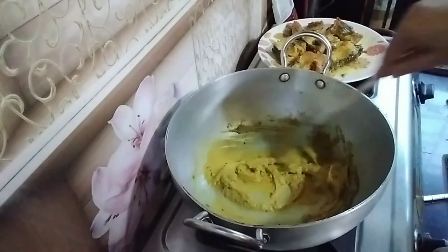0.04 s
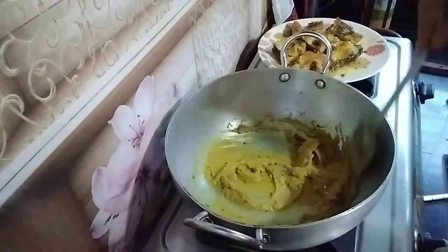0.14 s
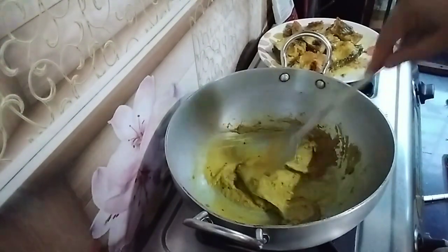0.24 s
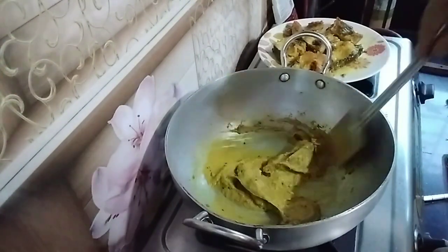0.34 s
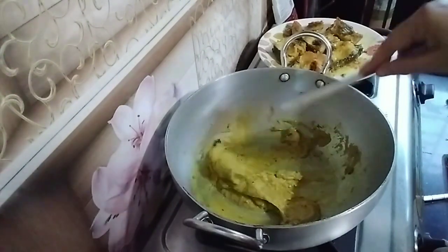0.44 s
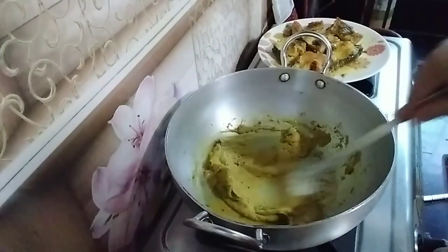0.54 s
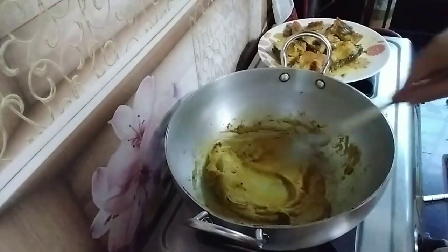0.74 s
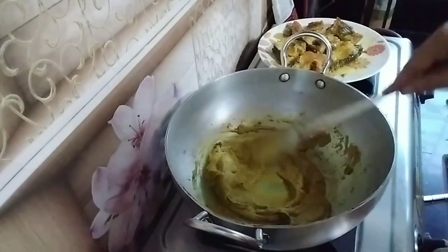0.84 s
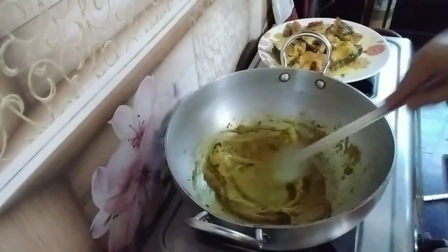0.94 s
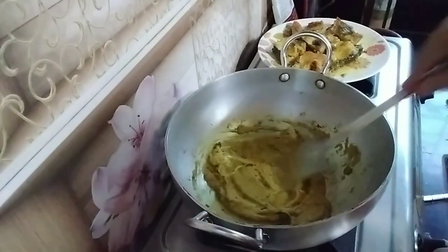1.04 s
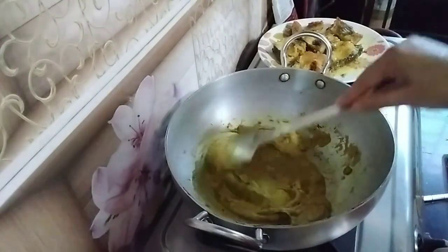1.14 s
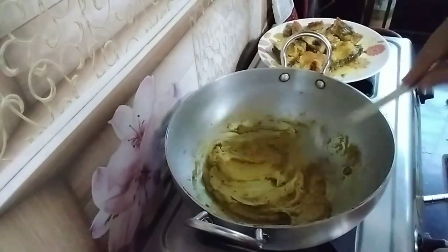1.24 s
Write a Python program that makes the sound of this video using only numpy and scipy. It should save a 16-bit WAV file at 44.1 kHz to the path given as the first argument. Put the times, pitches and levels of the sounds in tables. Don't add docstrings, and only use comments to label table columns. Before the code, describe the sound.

A metal spatula stirs thick paste in a thin metal pan. Short gritty scrapes open; at 0.2 s one loud, chattering clang rings and is quickly choked. Bright scrapes return at 0.34-0.43 s, then weaker ones from 0.6 to 0.8 s. A damped double knock lands near 1.07 s, followed by sticky ticks, a faint squeak and soft thuds until 1.3 s. Close phone microphone, small kitchen, low unsteady hum.

```python
import sys
import numpy as np
from scipy import signal
from scipy.fft import rfft, irfft, next_fast_len
from scipy.io import wavfile
from scipy.ndimage import uniform_filter1d

SR = 44100
rng = np.random.default_rng(int(sys.argv[2]) if len(sys.argv) > 2 else 0)


def dump_mix(stems):
    frames = np.atleast_2d(stems).T
    limited = np.clip(frames, -1, 1)
    pcm = np.round(limited * 32767).astype(np.int16)
    wavfile.write(sys.argv[1], SR, pcm)


def ratio_of_db(decibels):
    return 10 ** (np.asarray(decibels, float) / 20)


N = 57330
T = np.arange(N) / SR

# f/Hz, level/dB
HUM = [(12, -32), (20, 4.5), (328, -0.5), (1190, -15), (1530, -19), (1710, -18), (1910, -21), (3840, -27),
       (16000, -46)]
HUM_SIDE = [(30, 3), (100, -20.5), (350, -11), (1000, 3), (8000, -2.5)]
HUM_DB, FLICKER_DB = -49, 4.5
MAINS_HZ, MAINS_WIDTH_HZ, MAINS_DB = 103.1, 27, -55.5
RUMBLE_HZ, RUMBLE_WIDTH_HZ, RUMBLE_DB = 27, 12, -56.5

# t/s, length/s, level/dB, f/Hz
SMEARS = [
    (-0.0285, 0.058, -40, 570),
    (0.019, 0.059, -47, 920),
    (0.58, 0.051, -50, 800),
    (0.329, 0.047, -46, 300),
    (0.512, 0.088, -64, 16000),
]

# t/s, rise/s, hold/s, edge level/dB, bowl level/dB
STROKES = [(0, 0.00064, 0.015, -47, -48), (0.013, 0.013, 0.019, -48, -55.5),
           (.045, 0.012, 0.023, -57.5, -54), (0.16, .002, 0.0041, -50, -54),
           (0.174, 0.0008, 0.058, -47.5, -57), (0.3393, 0.00042, 0.0097, -37.5, -39.5),
           (0.35, 0.0034, 0.0034, -73, -66), (0.3735, 0.0025, 0.008, -37, -45),
           (.386, 0.0039, 0.021, -45, -34.5), (0.426, 0.0077, 0.041, -60.5, -72),
           (0.547, 0.013, 0.13, -64, -55), (0.608, 0.022, 0.0085, -47, -40.5),
           (0.644, 0.0034, 0.016, -62, -42), (0.674, 0.0059, 0.013, -68, -60.5),
           (0.703, 0.015, 0.037, -55, -45), (0.759, 0.0067, 0.018, -47.5, -42),
           (0.785, 0.006, 0.013, -60.5, -41), (0.812, 0.0052, 0.0084, -57.5, -49),
           (0.957, 0.0098, 0.016, -70.5, -58), (1.101, 0.0039, 0.0065, -63, -57)]
# f/Hz, width/Hz, level/dB
EDGE = [(3250, 200, -6), (4150, 250, -5), (5450, 250, -4), (6750, 200, -3), (7150, 200, -7),
        (7750, 200, -10)]
BOWL = [(1090, 90, -9), (1550, 120, -9), (1930, 100, -4), (2350, 80, -4), (2940, 100, -2), (3250, 80, -6),
        (3520, 100, -7), (4860, 250, -12)]
# f/Hz, level/dB
EDGE_DENSE = [(500, -26), (1500, -13), (3000, -5), (5500, 1), (7000, -4), (8500, -19), (16000, -34)]
BOWL_DENSE = [(300, -53), (700, -6), (1200, 2), (2700, 8), (3800, 1), (5500, -5), (9000, -28), (16000, -38)]
EDGE_DENSE_DB, BOWL_DENSE_DB, GRATE_T60_S = 2, -0.5, 0.0402
SLIPS_PER_S, SLIP_SCATTER_DB, GRIP_DB = 6000, 1.2, 1.5
RELEASE_S, STROKE_COLOUR_DB = 0.0083, 1

# t/s, length/s, level/dB, f/Hz, width/Hz
CATCHES = [(0.158, 0.032, -52, 5480, 250), (0.335, 0.017, -42, 3200, 500), (.375, 0.0054, -32, 6700, 900),
           (0.3798, 0.0055, -33.5, 6760, 900), (0.388, 0.026, -40, 2500, 300),
           (0.373, 0.013, -35, 5650, 400), (0.397, 0.012, -41, 1210, 249), (0.615, 0.03, -49.5, 6650, 200),
           (0.629, 0.03, -50, 1930, 90), (.648, .016, -45, 1077, 90), (.712, 0.031, -53, 5400, 120),
           (0.783, 0.02, -47.5, 1920, 90), (.786, .018, -47.5, 3450, 120), (.788, 0.0133, -51.5, 1120, 90),
           (0.803, 0.023, -44.5, 3070, 200), (0.834, 0.043, -62.5, 3090, 300),
           (1.114, 0.013, -59, 3080, 250)]

# t/s, level/dB, push/ms
BLOW = [
    (.2073, -4, .9),
    (.2107, -2, .14),
    (.2136, -2, .15),
    (.2165, -2, .15),
    (.2194, -3, .14),
    (.2222, -3, .14),
    (.2355, 0, .7),
]
# f/Hz, level/dB, t60/s
WALL = [(311.6, -9.5, 0.16), (352, -5.5, 0.1), (630, -1, 0.052), (667.5, 6.5, 0.048), (715, 1, .07),
        (910, -12, 0.1), (1295, 0.5, 0.3), (1290, 3, 0.24), (1520, 5, 0.1), (2160, -22, 0.057)]
WALL_EXTRA = [(2320, -6, 0.1), (2560, -10, 0.069), (2740, -15, 0.055), (2898, 5, 0.08), (3065, -7, 0.054),
              (3145, -2, .11), (3900, -8, 0.056), (4310, -4, 0.085), (5280, -3.5, .07), (5280, -1.5, 0.052),
              (6100, -16, 0.054), (6440, -11.5, 0.043)]
# f/Hz, level/dB
WALL_DENSE = [(150, -14), (250, -10), (800, -2.5), (1900, -11.5), (2960, -7), (4200, -8), (6300, -8),
              (8000, -20), (16000, -75)]
WALL_DENSE_DB, WALL_DENSE_T60_S = -1.5, 0.19
BLOW_DB, CHOKE_S, CHOKE_DB = 15.5, .227, -5
FLUTTER_DB, LOW_CUT_HZ = 4, 260
# start t/s, end t/s
CHATTER_S = (.2105, .2272)
CHATTER_DB, CHATTER_T60_S, CHATTER_PER_S, CHATTER_DAMP = -15.5, 0.015, 2600, 0.74

# f/Hz, level/dB
SHIMMER = [(2500, -25), (3400, -3), (5500, 9), (6800, -8), (9000, -27), (16000, -53)]
SHIMMER_DB, SHIMMER_T60_S = -33, 0.28

# t/s, level/dB, push/ms
KNOCKS = [
    (.3404, -36, 0.09),
    (1.0669, -23, 0.49),
    (1.0674, -33, 0.1),
    (1.0700, -33, 0.1),
    (1.0720, -34, 0.09),
    (1.0772, -26, 0.09),
    (1.0805, -33, .09),
    (1.0850, -37, 0.12),
    (1.1010, -39, 0.87),
]
# f/Hz, level/dB, t60/s
KNOCK = [(393, -6, .04), (640, 3, .02), (900, -1, .045), (1400, -5, .015), (1945, 0, .025), (2980, -9, .08),
         (3525, -8, .022), (5155, -8, .03), (6545, -9, .035), (6970, -4, .04)]
# f/Hz, level/dB
KNOCK_DENSE = [(300, -29), (450, -6), (1500, -4), (2700, -7), (5000, -2.5), (7500, -10), (14000, -30)]
KNOCK_DENSE_DB, KNOCK_T60_S = 1, 0.045

# t/s, level/dB, f/Hz, rise/s (the fall takes as long)
TICKS = [
    (0.818, -40, 6500, .003),
    (1.153, -50.5, 6440, 0.0024),
    (1.205, -53, 4480, .005),
    (1.216, -49, 8400, 0.0028),
    (1.228, -51.5, 7600, 0.012),
    (1.25, -45.5, 7300, 0.0075),
    (1.294, -44, 7660, 0.0041),
]
# t/s, length/s, level/dB, f/Hz
SQUEAKS = [
    (1.16, 0.026, -54, 4130),
    (1.273, .027, -66, 2700),
]
# t/s, level/dB, f/Hz
THUDS = [
    (1.236, -35, 197),
    (1.253, -44.5, 234),
    (1.296, -34.5, 270),
]

# f/Hz, left lead/rad
BLOW_PHASE = [(750, 0), (1000, -1.8), (1270, 1.3), (2400, 1.9), (2950, -1.5), (3400, -1.6), (4200, .7),
              (6800, 1.5)]
GRATE_PHASE = [(600, -.2), (1000, -.6), (1400, 1.2), (1950, .4), (2950, 1.8), (3500, .6), (5000, 2)]
# f/Hz, left minus right level/dB
BLOW_PAN = [(330, -1.5), (700, 3.5), (1270, -3), (2500, 3), (2950, -6), (4200, 3), (6500, 0), (9000, -7)]
GRATE_PAN = [(600, 1), (1400, 2), (1950, -5), (2950, 0), (4200, 4), (9000, 0)]
ROOM_DB, ROOM_T60_S, ROOM_DAMP_HZ, ROOM_GAP_S = -10, 0.24, 8740, 0.0027
# f/Hz, width/Hz, boost level/dB
LEFT_PORT = (6500, 1070, 5.06)
RIGHT_PORT = (10650, 650, 6.6)
CEILING, MIC_TOP_HZ = 1.8, 15000


def unit(x):
    return x / np.sqrt(np.sum(x ** 2))


def shaped(x, table, fn=ratio_of_db):
    f, value = np.array(table).T[:2]
    n = next_fast_len(x.shape[-1])
    hz = np.arange(n // 2 + 1) * SR / n
    gain = fn(np.interp(np.log(hz + 1), np.log(f), value))
    return irfft(rfft(x, n) * gain, n)[..., :x.shape[-1]]


def band(x, hz, width):
    return signal.lfilter(*signal.iirpeak(hz, hz / width, SR), x)


def decay(t, t60):
    return np.exp(-np.log(1000) * t / t60)


def half_sine(start, length):
    return np.sin(np.pi * np.clip((T - start) / length, 0, 1))


def walk(rate):
    k = int(SR / rate)
    steps = np.repeat(rng.standard_normal(N // k + 1), k)
    return 1.13 * uniform_filter1d(uniform_filter1d(steps, k), k)[:N]


def conv(x, h):
    return signal.fftconvolve(x, h)[:N]


def contacts(rows):
    return sum(ratio_of_db(db) * half_sine(s, ms / 1000) / (ms * SR / 1000) for s, db, ms in rows)


def body(modes, dense, dense_db, t60, rough=0., even=False, size=SR // 2):
    t = np.arange(size) / SR
    mass = rng.standard_normal(size)
    if even:
        phase = np.angle(rfft(mass * decay(t, max(t60 / 2, .004))))
        mass = irfft(np.exp(1j * phase), size) / decay(t, max(t60 * 2, .004))
    out = ratio_of_db(dense_db) * unit(shaped(mass, dense) * decay(t, max(t60, .004)))
    strong = 0
    for hz, db, mode_t60 in modes:
        mode = ratio_of_db(db) * np.sin(2 * np.pi * hz * t) * decay(t, max(mode_t60, .004))
        if rough:
            mode = mode * ratio_of_db(rough * np.sqrt(hz / 3000) * walk(103)[:size])
        strong = strong + mode
    out = out + unit(strong)
    return signal.sosfilt(signal.butter(4, LOW_CUT_HZ, "high", fs=SR, output="sos"), out)


def kitchen():
    pair = rng.standard_normal((2, N))
    rough = 0
    for hz in 22 * 2 ** np.arange(0, 9.6, .5):
        rough = rough + band(pair, hz, hz / 2) * np.sqrt(2 / hz) * ratio_of_db(FLICKER_DB * walk(12.6))
    hum = shaped(shaped(rough, [(20, 13), (20000, 43)]), HUM)
    out = hum / hum[0].std() * ratio_of_db(HUM_DB)
    for hz, width, db in ((MAINS_HZ, MAINS_WIDTH_HZ, MAINS_DB), (RUMBLE_HZ, RUMBLE_WIDTH_HZ, RUMBLE_DB)):
        tone = band(band(rng.standard_normal((2, N)), hz, width), hz, 2 * width)
        out = out + ratio_of_db(db) * tone / tone.std()
    side = shaped(out[1], HUM_SIDE)
    return np.array([out[0] + side, out[0] - side])


def smears():
    noise, out = rng.standard_normal(N), 0
    for s, length, db, hz in SMEARS:
        drag = noise * half_sine(s, length)
        out = out + ratio_of_db(db) * np.sqrt(SR / hz) * band(band(drag, hz, hz), hz, hz)
    return out


def slips(rate):
    size = ratio_of_db(SLIP_SCATTER_DB * rng.exponential(size=N))
    x = (rng.random(N) < rate / SR) * size * rng.choice([-1, 1], N)
    return x / x.std()


def grating():
    out = 0
    for col, peaks, dense, db in ((3, EDGE, EDGE_DENSE, EDGE_DENSE_DB), (4, BOWL, BOWL_DENSE, BOWL_DENSE_DB)):
        grit = slips(SLIPS_PER_S) * ratio_of_db(GRIP_DB * walk(150.4))
        for row in STROKES:
            start, rise, hold = row[:3]
            press = np.clip((T - start) / rise, 0, 1) ** 2
            press = press * np.exp(-np.maximum(T - start - rise - hold, 0) / RELEASE_S)
            modes = []
            for hz, width, level in peaks:
                detune, colour = rng.standard_normal(2)
                level = level + STROKE_COLOUR_DB * colour + 10 * np.log10(width)
                modes.append((hz * (1 + 0.0052 * detune), level, np.log(1000) / (np.pi * width)))
            metal = body(modes, dense, db, GRATE_T60_S, even=True, size=2048)
            out = out + conv(grit * ratio_of_db(row[col]) * press, metal)
    return out


def catches():
    noise, out = rng.standard_normal(N), 0
    for s, length, db, hz, width in CATCHES:
        rub = noise * half_sine(s, length) ** .5
        out = out + ratio_of_db(db) * np.sqrt(SR / width) * band(band(rub, hz, width), hz, 2 * width)
    return out


def hard_blow():
    wall = body(WALL + WALL_EXTRA, WALL_DENSE, WALL_DENSE_DB, WALL_DENSE_T60_S, rough=FLUTTER_DB, even=True)
    choke = CHOKE_DB * np.clip((T - CHOKE_S) * 400, 0, 1)
    ring = ratio_of_db(BLOW_DB + choke) * conv(contacts(BLOW), wall)
    held_modes = [(hz, db, t60 * CHATTER_DAMP) for hz, db, t60 in WALL_EXTRA]
    held = body(held_modes, WALL_DENSE, 0, CHATTER_T60_S, rough=FLUTTER_DB)
    gate = np.clip((T - CHATTER_S[0]) * 2000, 0, 1) * np.clip((CHATTER_S[1] - T) * 500, 0, 1)
    hits = (rng.random(N) < CHATTER_PER_S / SR) * rng.standard_normal(N) * np.sqrt(SR / CHATTER_PER_S)
    return ring + conv(ratio_of_db(CHATTER_DB) * gate * hits, held)


def shimmer():
    t = T - CHATTER_S[0]
    hiss = shaped(rng.standard_normal((2, N)), SHIMMER)
    level = ratio_of_db(SHIMMER_DB + GRIP_DB * walk(120))
    return level * hiss / hiss.std() * np.clip(t * 200, 0, 1) * decay(np.maximum(t, 0), SHIMMER_T60_S)


def knock():
    damped = body(KNOCK, KNOCK_DENSE, KNOCK_DENSE_DB, KNOCK_T60_S, rough=FLUTTER_DB)
    return -ratio_of_db(21.5) * conv(contacts(KNOCKS), damped)


def ticks():
    noise, out = rng.standard_normal(N), 0
    for s, db, hz, length in TICKS:
        burst = noise * half_sine(s, 2 * length)
        out = out + ratio_of_db(db) * band(band(burst, hz, hz / 2), hz, hz / 2)
    return out


def squeaks():
    return sum(ratio_of_db(db) * np.sin(2 * np.pi * hz * T) * half_sine(s, d) ** .5 for s, d, db, hz in SQUEAKS)


def thuds():
    return sum(ratio_of_db(db) * np.sin(2 * np.pi * hz * (T - s)) * half_sine(s, 2.3 / hz) for s, db, hz in THUDS)


def room(x):
    t = np.arange(SR // 2) / SR
    noise = rng.standard_normal((2, len(t)))
    low = signal.lfilter(*signal.butter(1, ROOM_DAMP_HZ, fs=SR), noise)
    fade = decay(t, ROOM_T60_S)
    tail = (low * fade + (noise - low) * fade ** 2) * np.clip(t / ROOM_GAP_S - 1, 0, 1)
    return ratio_of_db(ROOM_DB) * np.array([conv(x, unit(h)) for h in tail])


def ports(x, phase, pan):
    pair = []
    for side in (1, -1):
        turned = shaped(x, phase, lambda rad: np.exp(.5j * side * rad))
        pair.append(shaped(turned, pan, lambda db: ratio_of_db(side * db / 2)))
    return np.array(pair)


def scene():
    blow = hard_blow()
    near = smears() + grating() + catches() + knock() + ticks() + squeaks() + thuds()
    direct = ports(blow, BLOW_PHASE, BLOW_PAN) + ports(near, GRATE_PHASE, GRATE_PAN)
    return direct + room(blow + near) + kitchen() + shimmer()


def top_cut(x):
    return signal.sosfilt(signal.butter(12, 16190, fs=SR, output="sos"), x)


def record(dry):
    x = np.array([v + ratio_of_db(db) * band(v, hz, width) for v, (hz, width, db) in zip(dry, (LEFT_PORT, RIGHT_PORT))])
    x = signal.lfilter(*signal.butter(2, MIC_TOP_HZ, fs=SR), x)
    return top_cut(CEILING * np.tanh(x / CEILING))


dry = scene()
out = record(dry)
dump_mix(out)
```